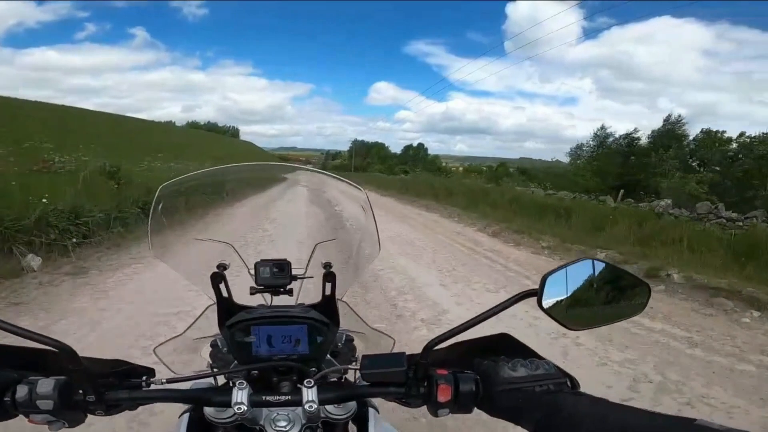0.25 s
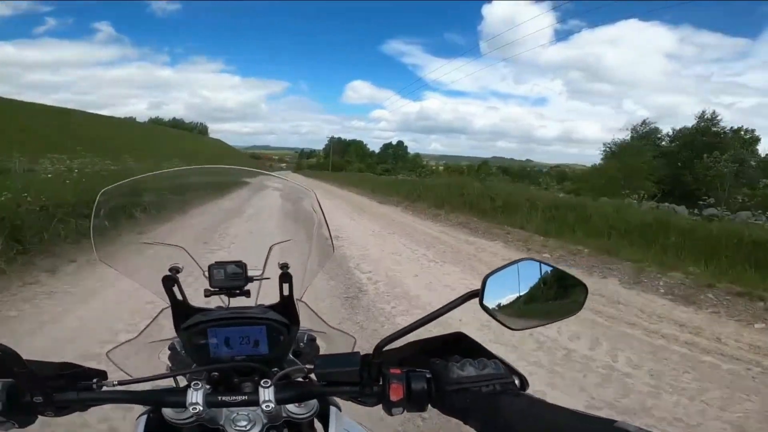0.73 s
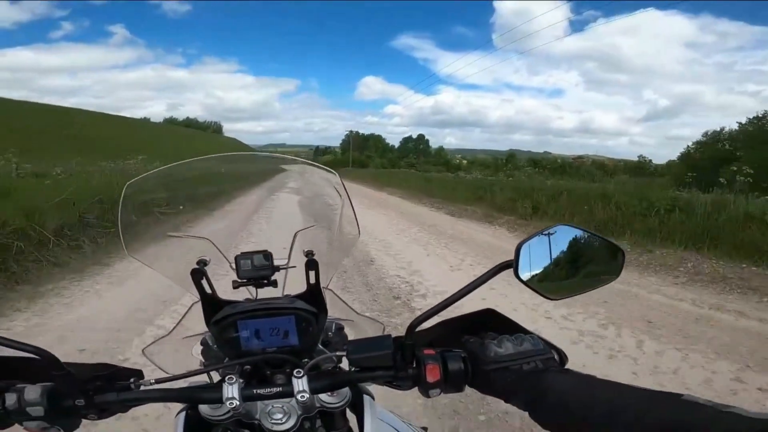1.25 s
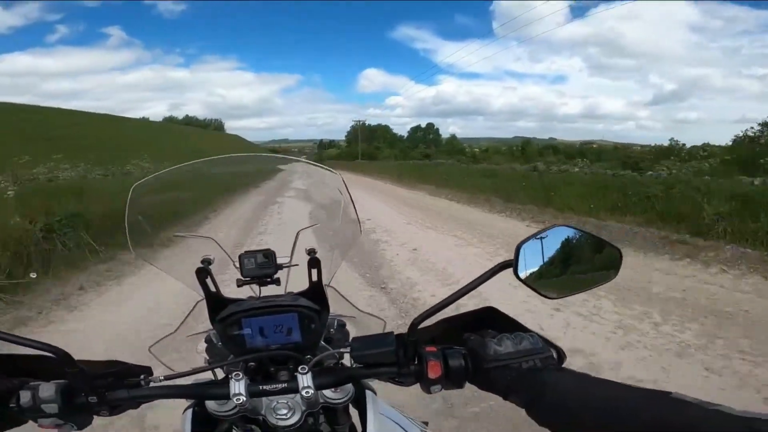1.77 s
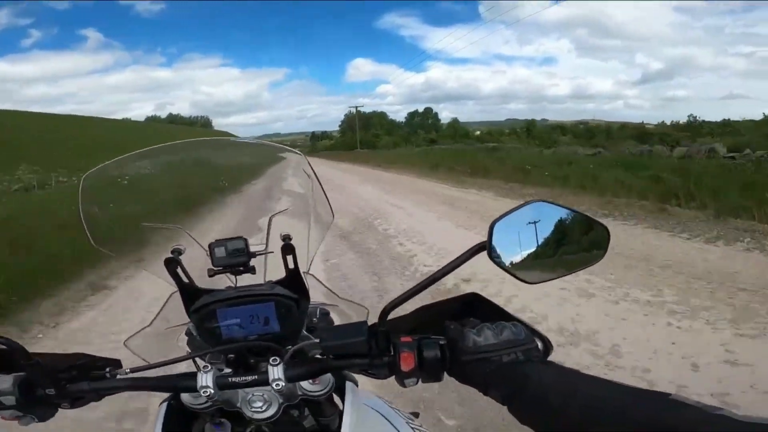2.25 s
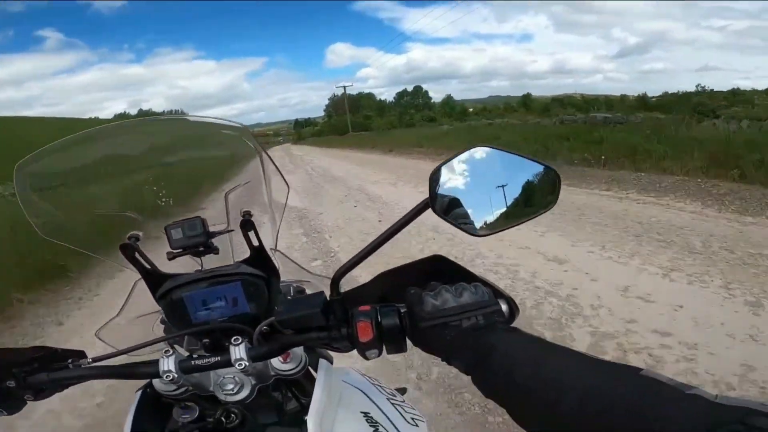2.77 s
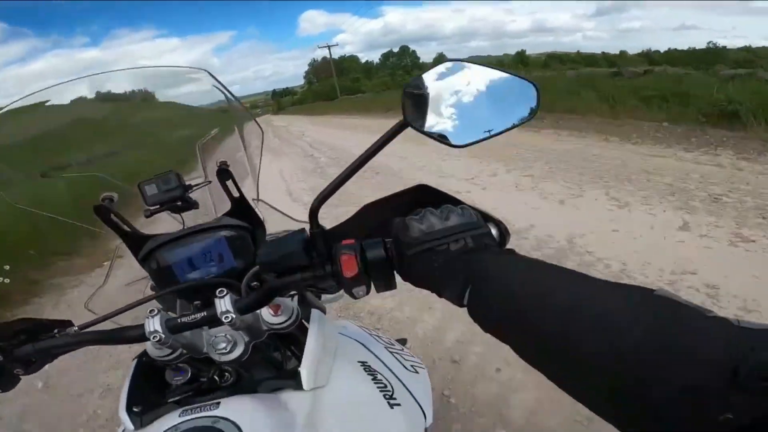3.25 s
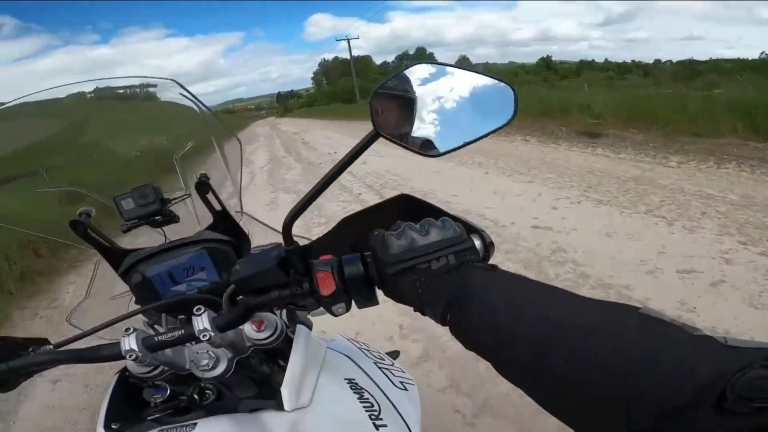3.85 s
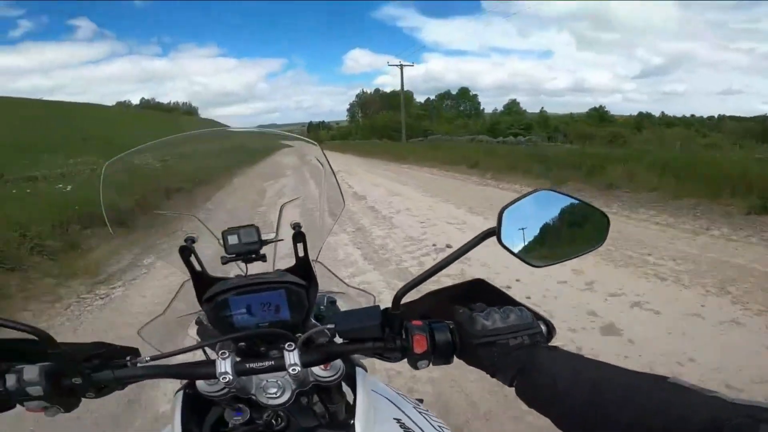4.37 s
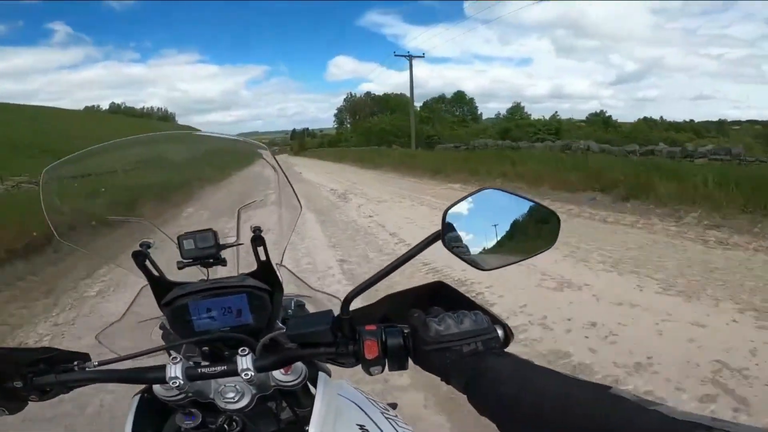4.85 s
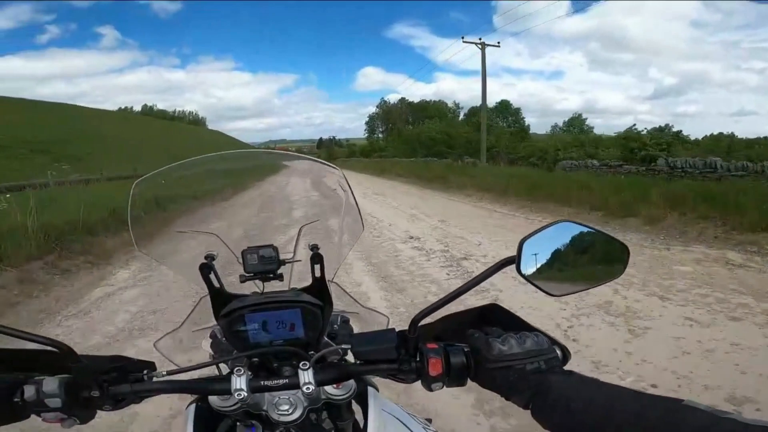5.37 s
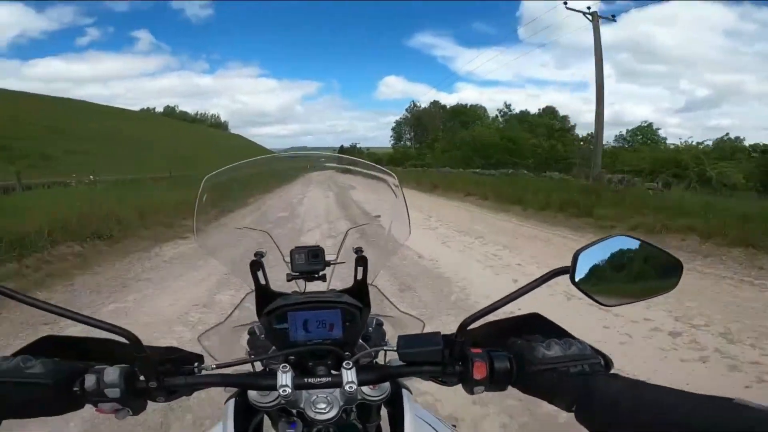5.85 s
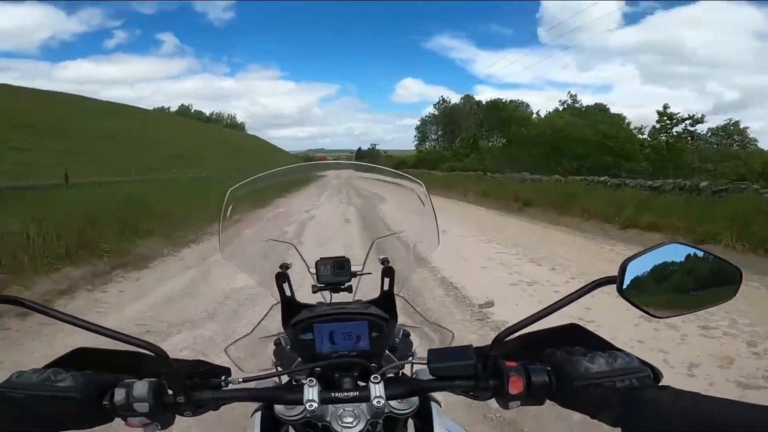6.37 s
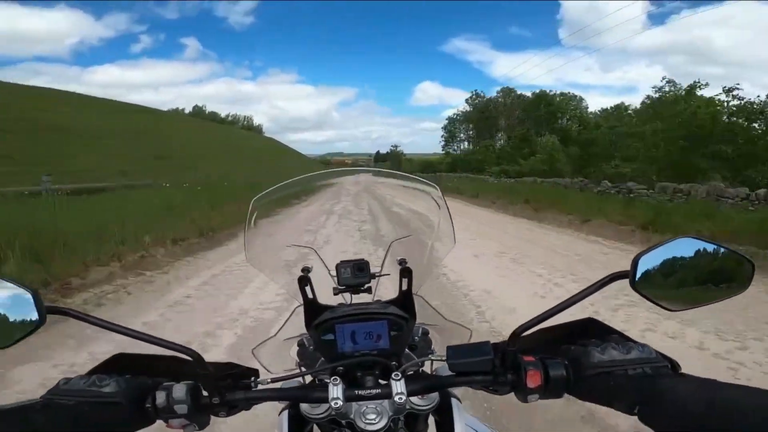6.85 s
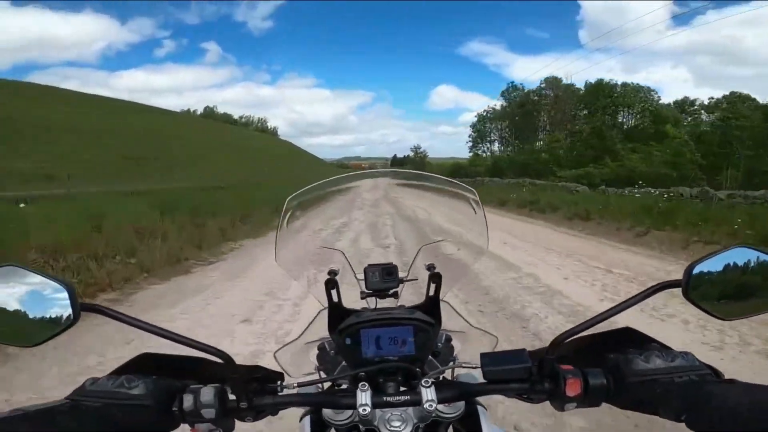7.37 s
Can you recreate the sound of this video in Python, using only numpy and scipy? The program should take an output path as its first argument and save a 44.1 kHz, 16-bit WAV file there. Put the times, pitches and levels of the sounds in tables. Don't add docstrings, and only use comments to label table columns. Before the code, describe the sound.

A motorcycle hums along a rough gravel lane in gusty wind, stones knocking and parts rattling, its note rising as the throttle opens, then easing.

```python
import sys
import numpy as np
from scipy import signal
from scipy.fft import rfft, irfft, next_fast_len
from scipy.io import wavfile
from scipy.ndimage import uniform_filter1d, map_coordinates

SR = 44100
rng = np.random.default_rng(int(sys.argv[2]) if len(sys.argv) > 2 else 0)


def transcribe(u):
    v = np.clip(np.atleast_2d(u).T, -1, 1)
    q = np.round(v * 32767).astype(np.int16)
    wavfile.write(sys.argv[1], SR, q)


def boost(x):
    u = np.asarray(x, float) / 20
    return 10 ** u


N = 336024

# [f/Hz, level/dB per Hz]
BUFFET_SPECTRUM = [(8, -4), (20, 1), (45, -7.5), (80, -15), (140, -46), (200, -120)]
FLAP_SPECTRUM = [(30, -120), (60, 1.5), (100, 0), (145, -4.5), (215, -3.5), (270, -7.5), (330, -22.5),
                 (500, -120)]
TEAR_SPECTRUM = [(150, -120), (260, 0.5), (400, -4), (600, -16.5), (1000, -42), (2000, -120)]
# [t/s, length/s, level/dB]
EDDIES = [(.11, .04, 4), (.22, .04, 5.5), (.5, 0.071, 4), (1.1, 0.28, 2), (1.5, 0.19, 4), (1.91, 0.031, 0),
          (2.01, 0.032, 3), (2.27, 0.053, 3), (2.57, 0.044, 5.5), (2.78, 0.14, -9), (3.0, .07, 5.5),
          (3.13, 0.06, -1), (3.2, .03, -6), (3.54, 0.036, 4.5), (3.64, 0.044, -9), (3.71, 0.058, 5.5),
          (3.9, .05, 1), (4.4, 0.059, 2), (4.7, 0.13, 6.5), (4.96, 0.038, 3.5), (5.09, 0.068, -5),
          (5.19, 0.034, 9), (5.3, .03, 6), (5.42, .05, 3.5), (6.28, 0.096, 1.5), (6.49, .05, 2.5),
          (7.0, 0.078, 3), (7.11, .04, 6.5), (7.3, 0.12, 1), (7.53, 0.11, 4.5)]
# [t/s, length/s, flap level/dB, tear level/dB]
GUSTS = [(0, 0.051, 4.5, 6.5), (.07, 0.042, 4.5, 4), (.17, .04, 5, 12), (.28, 0.054, 2, 10),
         (.4, 0.044, 4.5, 4), (.56, 0.059, 8.5, 10.5), (1.0, 0.15, 5, 0.5), (1.49, 0.041, 10.5, 0),
         (1.58, 0.076, 4.5, 5.5), (1.25, 0.17, 5, 2), (2.08, .05, 6, 8), (2.27, 0.095, 3.5, 5),
         (2.42, 0.052, 1, 3), (2.57, 0.059, 8, 2.5), (2.99, 0.068, 4, 0), (3.42, .06, 5, 0),
         (3.72, 0.055, 3.5, -1), (3.9, 0.058, 5, 7.5), (3.99, 0.065, 8.5, 2.5), (4.39, 0.09, 5, 5.5),
         (4.53, 0.046, 0.5, 3), (4.74, 0.086, 7, 8.5), (5.22, .05, 6.5, 12.5), (5.37, 0.12, 6, 7),
         (6.3, 0.62, 4.5, 2), (6.52, .07, -1.5, 2.5), (6.85, 0.32, 3.5, 1.5), (7.07, 0.043, 3.5, -2),
         (7.3, 0.082, 6.5, 4), (7.62, 0.09, -1, 8.5)]
BUFFET_DB, FLAP_DB, TEAR_DB = -18, -31.5, -41
FLAP_DB_PER_S = -0.2863
# [t/s, peak level/dB, length/s]
THUMPS = [
    (2.252, -1.5, 0.011),
    (3.829, -5, 0.01),
    (3.882, 0, 0.014),
    (4.731, -8, 0.022),
    (5.217, -1, 0.018),
    (7.581, -0.5, 0.008),
]

# [t/s, peak level/dB, f/Hz]
STONES = [
    (.2606, -15, 1150),
    (.2634, -11, 1040),
    (.2634, -19.5, 486),
    (.2668, -25, 1000),
    (.677, -23, 900),
    (.805, -33, 800),
]
# [t/s, peak level/dB, f/Hz]
GRIT = [
    (3.2045, -43, 11910),
    (3.2035, -47, 14000),
    (3.2055, -45, 9400),
    (3.409, -50, 13000),
    (7.301, -63, 12470),
]

# [t/s, length/s, jolt level/dB, brighter level/dB when the small parts jump]
BUMPS = [(0, 0.048, 7.5, 0), (.16, 0.049, 10, 1), (.4, 0.17, 2.5, 6), (.55, 0.051, 2, 4),
         (1.05, 0.12, 3, 6), (1.26, .1, 8, 1), (1.45, 0.17, 4, 3), (2.1, 0.049, 13.5, -2),
         (2.25, 0.044, 10, -6), (2.42, .07, 8, -2), (3.14, .03, 6.5, 4), (3.27, 0.047, 10.5, 1),
         (3.42, .03, 6, 5), (3.6, .08, 8.5, 4), (3.9, 0.041, 8, 4), (4.4, .07, 10.5, 0),
         (4.63, 0.047, 10.5, 1), (4.78, .08, 7, 0), (5.06, 0.035, -2, 3), (5.2, 0.031, 5, 4),
         (5.46, .04, 2, 7), (5.7, .03, -4, 2), (5.8, .06, 3, 3), (5.89, 0.037, 2, 5), (6.3, 0.5, 4.5, -3),
         (6.65, .1, 4.5, -6), (6.81, 0.037, 5, -1.5), (7.0, .05, 1, -18), (7.45, 0.16, 3, 0)]
# [f/Hz, width/Hz, level/dB]
CAVITIES = [(742, 170, 0), (860, 61, -1.5), (1072, 97, -3)]
# [f/Hz, level/dB per Hz]
CLATTER_SPECTRUM = [(2000, -28), (3000, -5), (3800, -10.5), (4300, -12), (4880, -13.5), (6080, -17.5),
                    (6610, -13.5), (8300, -13.5), (9900, -11.5), (10600, -17), (12200, -18.5), (12800, -24),
                    (14700, -25), (15700, -25)]
# [f/Hz, width/Hz, level/dB]
LOOSE_PARTS = [(3300, 145, 3.5), (4810, 280, -6.5), (5660, 250, -12.5), (6620, 360, -10), (8000, 260, -12),
               (9120, 1160, -14.5)]
SMALL_PARTS_HZ = 5300
RATTLE_DB, ROAR_DB, RING_DB = -56, -37.5, -39
ROAR_BY_JOLT, ROAR_BY_GUST, RING_BY_JOLT = 0.067, 0.29, 0.32
ROAR_DB_PER_HZ, RING_DB_PER_HZ = 0.0732, 0.1327

# [f/Hz, width/Hz, level/dB]
CASING = [(1532, 74, -2.5), (1780, 190, -2.5), (1972, 127, 1), (2190, 140, -3.5), (2223, 78, -2.5),
          (2389, 94, -2), (2506, 210, -6), (2695, 134, -7.5), (3120, 110, -10), (3780, 110, -15.5),
          (3970, 120, -43), (4670, 110, -31)]
TEETH = [29.8, 31.15, 33.9]
MESH_DB = [-49.5, -48.5, -54.5]
# [t/s, primary drive level/dB, cam drive level/dB]
MESH_LOAD = [(0, -2, -10), (.5, 3, -1), (.9, -5, -1), (1.7, -12, 3), (2.5, 0.5, -4), (3.0, -1.5, 3),
             (3.6, 2.5, 3.5), (4.4, 4, -1), (4.8, -4, -1), (5.1, 0.5, 3), (5.6, -9, -3), (6.1, 2.5, 2),
             (6.4, -5, 0), (6.9, 3, 1), (7.3, -2, 5), (7.5, 9.5, 3)]
MESH_DB_PER_HZ = 0.3153
PUMP_DB_PER_HZ = .5
WHINE_HZ, WHINE_WIDTH_HZ = 4800, 220

# [t/s, turns f/Hz]
CRANK = [(0, 69.47), (.6, 68.58), (1.5, 65), (2.5, 64.41), (2.84, 67.45), (2.9, 61.76), (3.12, 68.34),
         (3.25, 65.7), (4.0, 69), (4.4, 70.16), (5.0, 75.3), (5.85, 81.4), (5.95, 77.5), (6.35, 80.17),
         (6.8, 83), (6.9, 76.2), (7.2, 78.9), (7.62, 77.23)]
# [t/s, level/dB]
THROTTLE = [(0, -27.5), (.3, -27.5), (.7, -39.5), (1.2, -31), (1.8, -38), (2.1, -28), (2.45, -28.5),
            (2.8, -21), (3.85, -26.5), (4.2, -19), (4.85, -21.5), (5.15, -18.5), (5.4, -25.5), (5.75, -19),
            (6.2, -36), (6.35, -26.5), (6.7, -23), (6.95, -29.5)]
# [t/s, level/dB]
SEAT = [(0, -14.5), (.3, -19), (.6, -18.5), (2.4, -17.5), (2.6, -22), (3.0, -18), (3.95, -18.5), (4.1, -35),
        (4.3, -19), (4.9, -33), (5.15, -19.5), (5.3, -29.5), (5.8, -22.5), (6.05, -16), (6.55, -20.5),
        (6.9, -15), (7.3, -16.5), (7.62, -18)]
# [crank order, level/dB to the third order]
OVERTONES = [(2, -15), (10, -37), (11, -29.5)]
AIRBOX_HZ, AIRBOX_WIDTH_HZ, FOURTH_DB = 254.2, 18.5, -5


def unit(x):
    return x / np.sqrt(np.mean(x ** 2) + 1e-20)


def curves(rows):
    s, *cols = np.transpose(rows)
    return [np.interp(np.arange(N) / SR, s, c) for c in cols]


def swells(rows):
    s, length, *cols = np.transpose(rows)
    t = np.arange(0, N + 64, 64) / SR
    bell = np.exp(-((t - s[:, None]) / length[:, None]) ** 2)
    return [np.interp(np.arange(N) / SR, t, c @ bell) for c in cols]


def wobble(rate):
    at = np.arange(0, N + 16, 16)
    knots = rng.standard_normal(int(N * rate / SR) + 4)
    return np.interp(np.arange(N), at, map_coordinates(knots, [at * rate / SR]))


def filtered(x, response):
    m = next_fast_len(N + SR // 2)
    return irfft(rfft(x, m) * response(np.fft.rfftfreq(m, 1 / SR)), m)[:N]


def slope(points):
    f, db = np.transpose(points)
    return lambda hz: boost(np.interp(np.log(hz + 1), np.log(f + 1), db))


def resonances(modes, top_hz):
    def response(f):
        power = 0
        for c, w, db in modes:
            power = power + boost(2 * db) * (f * w) ** 2 / ((c * c - f * f) ** 2 + (f * w) ** 2)
        return np.sqrt(power / (1 + (f / top_hz) ** 6))
    return response


def rush(response, patchy_db, gate=1):
    z = signal.stft(rng.standard_normal(N), nperseg=512)[2]
    field = uniform_filter1d(rng.standard_normal(z.shape), size=6, axis=0)
    field = uniform_filter1d(field, size=12, axis=1)
    noise = signal.istft(z * boost(patchy_db * unit(field)), nperseg=512)[1][:N]
    return unit(filtered(noise * gate, response))


def steady(x, span):
    size = int(span * SR)
    power = uniform_filter1d(uniform_filter1d(x ** 2, size=size), size=size)
    return x / np.sqrt(np.abs(power) + .05)


def tone(turns, order, drift, flutter_db):
    size = np.sqrt(2) * boost(flutter_db * wobble(14))
    return size * np.sin(2 * np.pi * order * turns + drift * wobble(9))


def wind():
    buffet_db = BUFFET_DB + swells(EDDIES)[0]
    flap_gust_db, tear_gust_db = swells(GUSTS)
    flap_db = FLAP_DB + flap_gust_db + FLAP_DB_PER_S * np.arange(N) / SR
    tear_db = TEAR_DB + tear_gust_db
    eddy = wobble(22)
    tear_gate = boost(1.5 * eddy + 1.2 * wobble(50))
    buffet = steady(rush(slope(BUFFET_SPECTRUM), patchy_db=.3), span=.07)
    flap = steady(rush(slope(FLAP_SPECTRUM), patchy_db=.6, gate=boost(1.5 * eddy)), span=.07)
    tear = steady(rush(slope(TEAR_SPECTRUM), patchy_db=.8, gate=tear_gate), span=.07)
    return boost(buffet_db + 3.0) * buffet + boost(flap_db + 8) * flap + boost(tear_db + 4.0) * tear


def thumps():
    t = np.arange(N) / SR
    return -sum(boost(db) * np.exp(-((t - s) / (0.19 * length)) ** 2) for s, db, length in THUMPS)


def gravel():
    out = np.zeros(N + SR)
    t = np.arange(-300, 300) / SR
    for rows, cycles in ((STONES, .9), (GRIT, 4)):
        for s, db, hz in rows:
            knock = np.exp(-(t * hz / cycles) ** 2) * np.sin(2 * np.pi * hz * t)
            out[round(s * SR) - 300:][:len(t)] += boost(db) * knock
    return out[:N]


def running_gear(turns, speed_hz):
    jolt_db, bright_db = swells(BUMPS)
    beat = 1 + 0.16 * np.cos(2 * np.pi * turns) + 0.068 * np.cos(4 * np.pi * turns)
    clatter = rush(slope(CLATTER_SPECTRUM), patchy_db=1.5, gate=beat * boost(.7 * wobble(60)))

    parts = resonances(LOOSE_PARTS, top_hz=8600)
    rattle = rush(lambda f: parts(f) * f / (f + 3000), patchy_db=2, gate=boost(2.2 * wobble(70)))
    rattle = rattle + (boost(bright_db) - 1) * filtered(rattle, lambda f: f > SMALL_PARTS_HZ)
    rattle_db = 1.37 * (RATTLE_DB + jolt_db + 50) - 53.5

    cavities = resonances(CAVITIES, top_hz=2070)
    roar = rush(lambda f: cavities(f) * f / (f + 600), patchy_db=-0.5, gate=boost(0.17 * wobble(30)))
    roar_db = ROAR_DB + ROAR_DB_PER_HZ * (speed_hz - 70) + ROAR_BY_JOLT * jolt_db
    roar_db = roar_db + ROAR_BY_GUST * swells(GUSTS)[1] + 0.59 * wobble(12)
    return boost(-51.5) * (speed_hz / 70) ** 1.2 * clatter + boost(rattle_db) * rattle + boost(roar_db) * roar


def gears(speed_hz):
    faster_hz = speed_hz - 70
    primary_db, cam_db = curves(MESH_LOAD) + MESH_DB_PER_HZ * faster_hz
    loads_db = (primary_db, cam_db, PUMP_DB_PER_HZ * faster_hz)
    lines = 0
    for teeth, rest_db, load_db in zip(TEETH, MESH_DB, loads_db):
        phase = 2 * np.pi * np.cumsum(teeth * speed_hz) / SR
        line = (.45 + .9 * wobble(95)) * np.cos(phase) + .9 * wobble(95) * np.sin(phase)
        lines = lines + boost(rest_db + load_db + 3) * line
    casing = resonances(CASING, top_hz=5200)
    lines = filtered(lines, lambda f: casing(f) ** 1.6)

    overtone = boost(-57.5) * wobble(120) * np.cos(2 * np.pi * 61.8 * np.cumsum(speed_hz) / SR)
    whine = filtered(overtone, resonances([(WHINE_HZ, WHINE_WIDTH_HZ, 0)], top_hz=9000))

    ring = rush(lambda f: casing(f) * f / (f + 1500), patchy_db=1.25)
    ring_db = RING_DB + RING_BY_JOLT * swells(BUMPS)[0] + RING_DB_PER_HZ * faster_hz
    return boost(3.5) * lines + whine + boost(ring_db - 1.5) * ring


def engine(turns, speed_hz):
    third_db, = curves(THROTTLE)
    shake_db, = curves(SEAT)
    off_mode = (4 * speed_hz - AIRBOX_HZ) / AIRBOX_WIDTH_HZ
    fourth_db = third_db + FOURTH_DB - 20 * np.log10(1 + off_mode ** 2)
    hum = boost(shake_db) * tone(turns, order=1, drift=.1, flutter_db=1.2)
    hum += boost(shake_db - 23) * tone(turns, order=2, drift=.3, flutter_db=-3.5)
    hum += boost(third_db) * tone(turns, order=3, drift=.08, flutter_db=.6)
    hum += boost(fourth_db) * tone(turns, order=4, drift=0.77, flutter_db=-2.0)
    for order, db in OVERTONES:
        hum += boost(third_db + db) * tone(turns, order=order, drift=1.0, flutter_db=-5.5)
    return hum


def scene():
    speed_hz, = curves(CRANK)
    turns = np.cumsum(speed_hz) / SR
    air = wind() + thumps()
    bike = running_gear(turns, speed_hz) + gears(speed_hz) + engine(turns, speed_hz)
    return (air + gravel() + bike)[None]


def band_limit(x):
    return signal.sosfilt(signal.butter(12, 15620, fs=SR, output="sos"), x)


def record(dry):
    top, knee = .99, 14
    x = filtered(dry[0], lambda f: 1j * f / (3 + 1j * f))[None]
    x = x * np.minimum(1, np.arange(N)[::-1] / (.004 * SR))
    mix = x / (1 + np.abs(x / top) ** knee) ** (1 / knee)
    return band_limit(mix)


dry = scene()
out = record(dry)
transcribe(out)
```